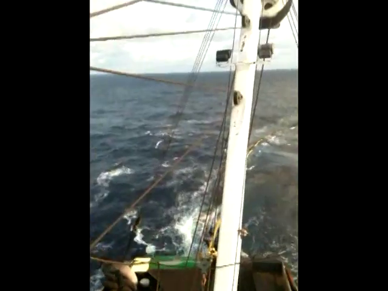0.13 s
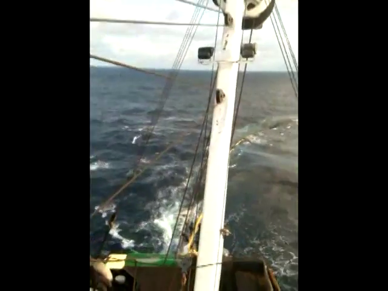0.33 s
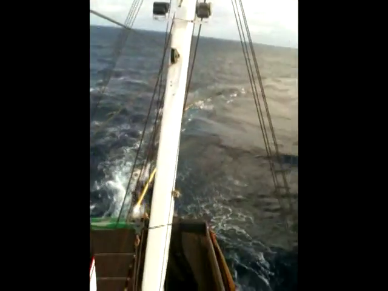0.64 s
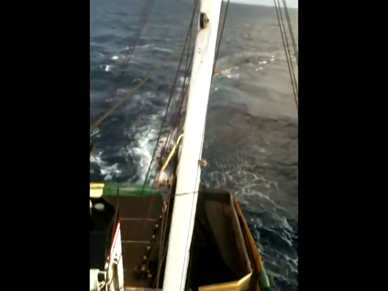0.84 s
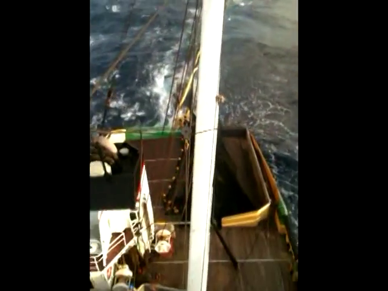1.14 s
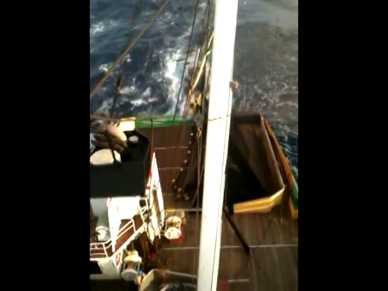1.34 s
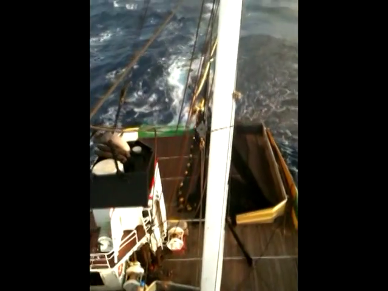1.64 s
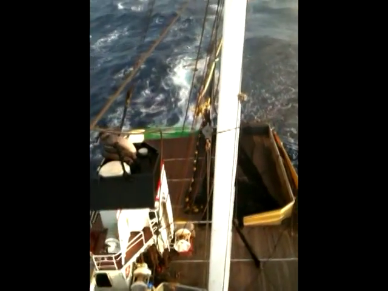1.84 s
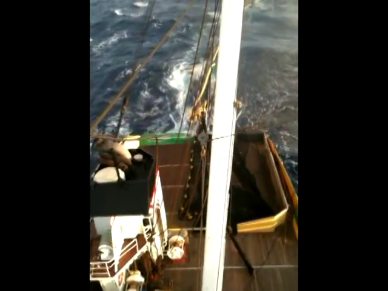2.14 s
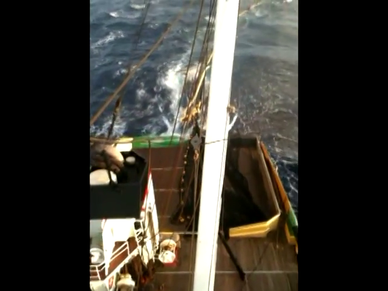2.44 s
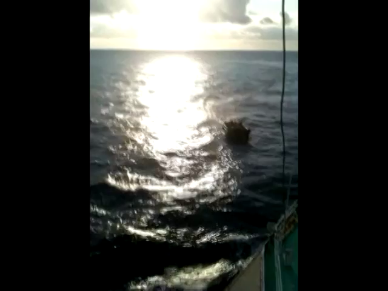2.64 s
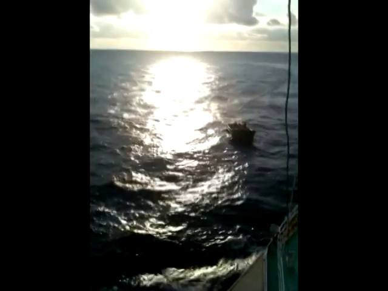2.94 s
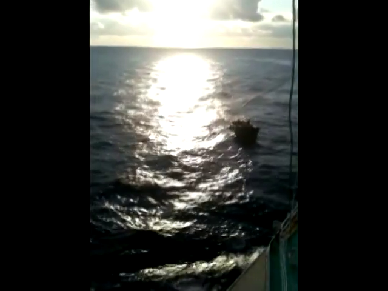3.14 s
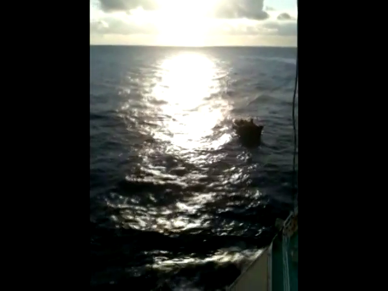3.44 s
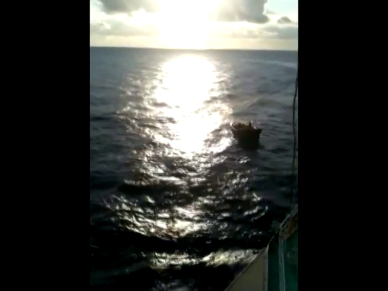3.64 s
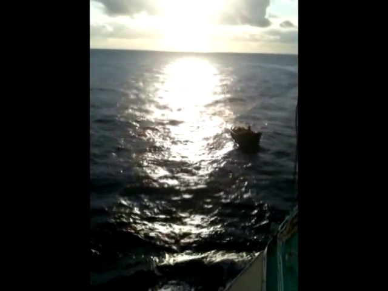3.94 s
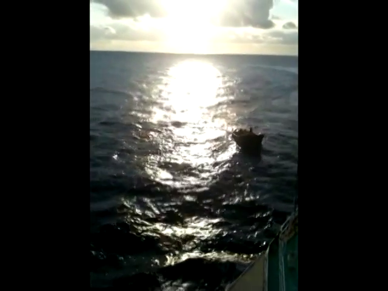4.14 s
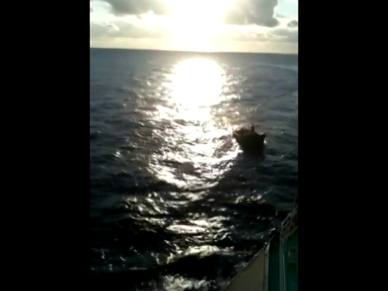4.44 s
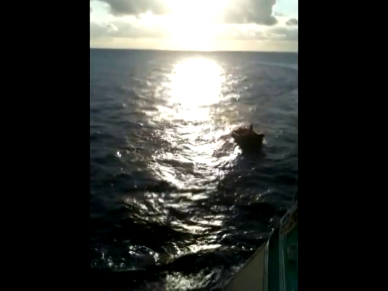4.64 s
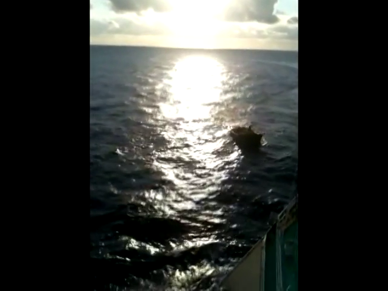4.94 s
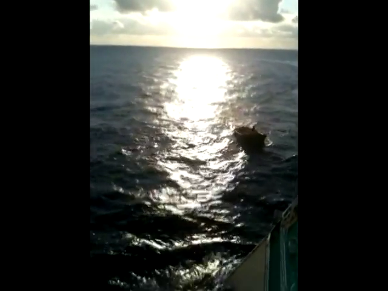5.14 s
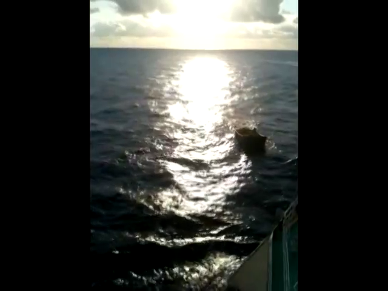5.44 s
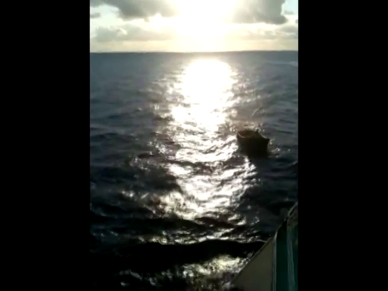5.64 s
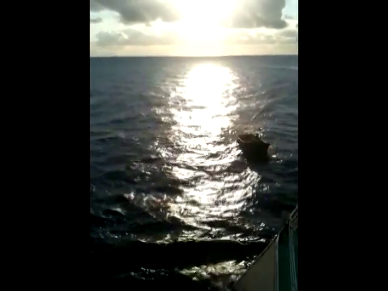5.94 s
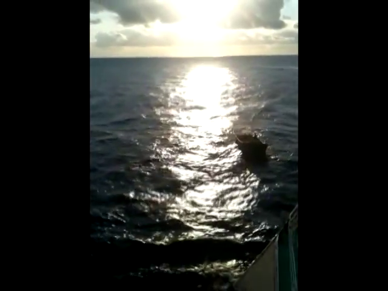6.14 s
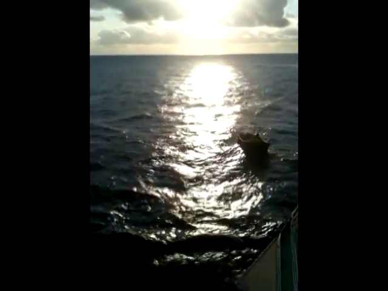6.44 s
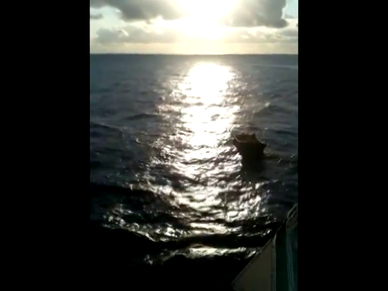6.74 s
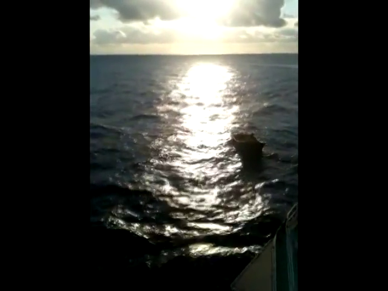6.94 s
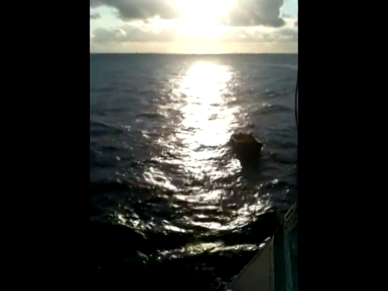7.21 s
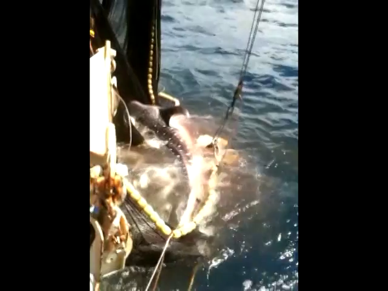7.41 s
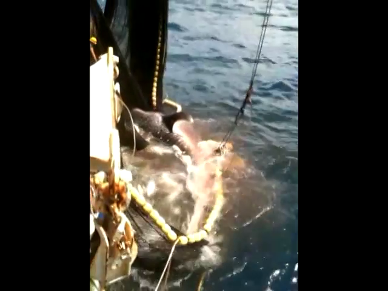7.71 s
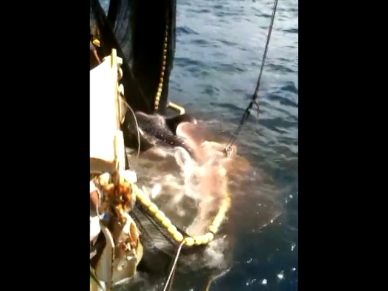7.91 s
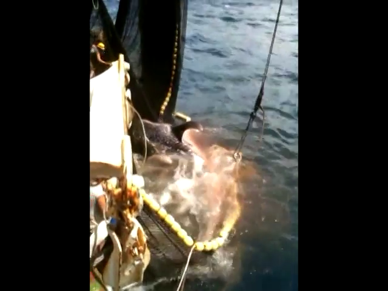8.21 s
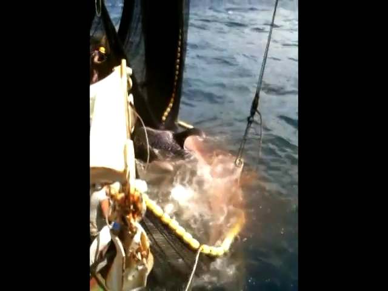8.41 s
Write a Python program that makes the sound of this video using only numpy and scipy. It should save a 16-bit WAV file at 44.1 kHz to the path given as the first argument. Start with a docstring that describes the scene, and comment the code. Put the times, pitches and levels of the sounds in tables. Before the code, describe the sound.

Three abrupt views of a working boat at sea. First a dense engine roar with hissing wash, rapid metallic chirps and short groans. Then a much softer, dull drone with generator hum and barely audible thin whistle, almost no hiss. Finally the full roar returns, with steady hydraulic and gear whine and a cluster of dull hull knocks at its start. Close, small-microphone outdoor sound, little bass.

```python
"""A diesel engine drones in a fishing boat at sea, heard from three places in turn: high over the working deck,
at a sheltered rail and beside the net. Shaped noise beats at the firing rate; wash and wind are its hiss.
Over the deck, stick-slip noise through sharp modes makes a sheave squeak and scrape and a winch drum groan.
The rail adds a generator hum and a whistle that runs down; beside the net come the sines of a hydraulic pump
and winch gears, and decaying sines that thump."""
import sys
import numpy as np
from scipy import signal
from scipy.fft import rfft, irfft, next_fast_len
from scipy.io import wavfile
from scipy.ndimage import uniform_filter1d, map_coordinates

SR = 44100
rng = np.random.default_rng(int(sys.argv[2]) if len(sys.argv) > 2 else 0)


def store_wav(level_fs):
    """Save 16-bit WAV to argv[1]."""
    pcm = np.round(np.clip(np.atleast_2d(level_fs), -1, 1) * 32767)
    wavfile.write(sys.argv[1], SR, pcm.T.astype(np.int16))


N = 377923
T = np.arange(N) / SR  # time of each sample (s)


def amp(db):
    """Decibels to amplitude ratio: 20 dB is a factor of ten."""
    return 10 ** (np.asarray(db) / 20)


def unit(x):
    """Normalisation to an rms of 1."""
    return x / np.sqrt(np.mean(x ** 2) + 1e-20)


def along(points, hz):
    """Interpolation of (frequency, value) points on a logarithmic frequency axis."""
    f, v = np.transpose(points)
    return np.interp(np.log(hz + 1), np.log(f + 1), v)


def curves(rows):
    """Linear interpolation in time: one curve for each column after the time."""
    s, *columns = np.transpose(rows)
    return [np.interp(T, s, column) for column in columns]


def wobble(rate):
    """Smooth random modulation: a spline through rate random knots a second."""
    knots = rng.standard_normal(int(N * rate / SR) + 4)
    return map_coordinates(knots, [T * rate])


def filtered(x, response):
    """Linear filtering: the spectrum of x times a response of frequency."""
    m = next_fast_len(N + SR // 2)  # padded against wrap-around
    return irfft(rfft(x, m) * response(np.fft.rfftfreq(m, 1 / SR)), m)[:N]


def ringing(x, modes):
    """Modal superposition: x through parallel resonances of alternating sign, at rms 1."""
    def response(f):
        return sum((-1) ** k * amp(db) * 1j * f * width / (hz * hz - f * f + 1j * f * width)
                   for k, (hz, width, db) in enumerate(modes))
    return unit(filtered(x, response))


def tone(hz, drift_hz):
    """Frequency modulation: a sine of rms 1 whose pitch drifts a little at random."""
    cycles = np.cumsum(hz + drift_hz * wobble(6)) / SR
    return np.sqrt(2) * np.sin(2 * np.pi * cycles + rng.uniform(0, 2 * np.pi))


def patches(x, gain):
    """Time-frequency modulation: smoothed random patches set the gain of x."""
    z = signal.stft(x, nperseg=512)[2]
    field = uniform_filter1d(rng.standard_normal(z.shape), 7, 0)
    field = uniform_filter1d(field, 8, 1)
    return signal.istft(z * gain(unit(field)), nperseg=512)[1][:N]


def patchy(depth_db):
    """Turbulent noise: white noise made uneven in time and frequency."""
    return patches(rng.standard_normal(N), lambda field: amp(depth_db * field))


def bursts(rows, rise):
    """Transient envelope: a linear rise under a Gaussian fall, for rows of (start_s, level_db, length_s)."""
    return sum(amp(db) * np.clip((T - s) / rise, 0, 1) * np.exp(-np.clip((T - s) / abs(span), 0, 9) ** 2)
               for s, db, span in rows)


def spells(rows, rise, fall):
    """Driven-then-free envelope: linear attack, hold, exponential release, for (start_s, level_db, held_s)."""
    out = np.zeros(N)
    for s, db, held in rows:
        part = slice(*np.searchsorted(T, [s, s + abs(held) + 12 * abs(fall)]))
        t = T[part] - s
        out[part] += amp(db) * np.clip(t / rise, 0, 1) * np.exp(-np.clip(t - held, 0, None) / fall)
    return out


def slips(rate, depth_db):
    """Stick-slip friction: noise whose level is redrawn rate times a second, its peaks limited."""
    return rng.standard_normal(N) * amp(depth_db * np.clip(wobble(rate), -3, 1.5))


def rubbed(hz, width, rate, depth_db):
    """Friction-driven resonance: slips through one mode twice, for steep skirts."""
    mode = [(hz, 1.6 * width, 0)]  # two passes narrow it back to about the given width
    return ringing(ringing(slips(rate, depth_db), mode), mode)


def wandering(modes, rate, depth_db, wander_db):
    """Mode competition: rubbed modes take turns at being loudest."""
    return unit(sum(amp(db + wander_db * wobble(24.96)) * rubbed(hz, width, rate, depth_db)
                    for hz, width, db in modes))


def engine(place, spectrum, hull_db, beat, patchy_db):
    """Pulse excitation and plate resonance: firing beats in the drone, noise rings the hull, and hiss lies above."""
    # by place: time_s, drone_level_db, hiss_level_db (rms from 800 to 3500 Hz)
    levels = [
        [(0, -26.5, -27), (1, -26.5, -28.5), (1.9, -25, -26), (2.67, -25.5, -26.5)],
        [(2.7, -32.5, -50), (3.1, -29.5, -49.5), (3.8, -33.5, -53), (5.3, -33.5, -52), (6.2, -33, -51.5),
         (7.34, -34, -51.5)],
        [(7.37, -27.5, -28.5), (7.7, -26, -28.5), (8.55, -27.5, -30)],
    ]
    # strongest engine tones, by place: pitch_hz, level_db
    drone_tones = [
        [(155, -37.5), (241, -38.5)],
        [(133, -51.5), (162, -41), (242, -42), (264, -46.5), (298, -49.5), (920, -67), (1210, -70),
         (1490, -71.5)],
        [(153, -37), (228, -42)],
    ]
    # hull plate modes: pitch_hz, width_hz, relative_level_db
    hull_modes = [(153.3, 13.2, -1.5), (244.3, 9.9, -2.5), (162.4, 5.8, -6.5), (498.4, 15, -9),
                  (545, 19, -11.5)]
    firing_hz = 33.3

    def low(f):
        return 1 / (1 + (f / 700) ** 4)

    drone_db, hiss_db = curves(levels[place])
    cycle = np.cumsum(firing_hz + 0.251 * wobble(1)) / SR % 1
    firing = np.exp(-cycle / 0.04)  # one exhaust pulse per firing
    push = patchy(patchy_db) + beat * unit(firing - firing.mean())
    drone = unit(filtered(push, lambda f: amp(along(spectrum, f)) * low(f)))
    hull = filtered(ringing(rng.standard_normal(N), hull_modes), low)
    drone = unit(drone + amp(hull_db) * hull)

    hiss = filtered(patchy(patchy_db), lambda f: amp(along(spectrum, f)) * (1 - low(f)))
    hiss /= np.std(filtered(hiss, lambda f: (f > 800) & (f < 3500)))
    tones = sum(amp(db + 2.5 * wobble(7)) * tone(hz, 2.176) for hz, db in drone_tones[place])
    return tones + amp(drone_db + 0.48 * wobble(3.5)) * drone + amp(hiss_db + 0.3 * wobble(7)) * hiss


def sheave_squeak():
    """Stick-slip: two sheave modes flutter as it runs, easing with time, and chirp at the sharpest squeaks."""
    # low and high sheave mode: pitch_hz, width_hz, running_offset_db
    modes = [(7220, 240, -2.5), (7700, 370, -3)]
    # sharpest squeaks: start_s, held_s, low_mode_db, high_mode_db
    chirps = [(.002, .018, -38.5, -41), (0.079, .012, -40.5, -27.5), (.1, .02, -31.5, -28),
              (.148, .012, -36, -34), (.198, .024, -40, -36), (.25, .03, -40.5, -43),
              (.296, .024, -27.5, -30.5), (.372, .022, -39, -42), (.53, .02, -42, -41),
              (.548, .012, -40.5, -33), (.588, .01, -38.5, -40.5), (.638, .024, -28.5, -39),
              (.672, .03, -38, -44.5), (.728, .02, -36, -41), (.822, .008, -41.5, -43),
              (.84, .04, -46.5, -45), (.97, .036, -36.5, -37.5), (1.246, .012, -33.5, -30),
              (1.508, .02, -43, -52), (2.02, .055, -45.5, -42), (2.279, .008, -46, -32),
              (2.386, .022, -41.5, -41)]
    running_db = -41 - 4.5 * T  # eases by 4.5 dB per second
    squeak = 0
    for k, (hz, width, db) in enumerate(modes):
        running = amp(running_db + db + 3.2 * wobble(45))
        chirping = spells([(row[0], row[2 + k], row[1]) for row in chirps], .005, 0.0084)
        squeak = squeak + (running + chirping) * rubbed(hz, width, rate=220, depth_db=5.0)
    return squeak


def sheave_squeal():
    """Mode locking: competing high modes squeal in spells, and at moments one clear pitch stands out."""
    # high modes: pitch_hz, width_hz, relative_level_db
    modes = [(10980, 280, 0.5), (11400, 96, -2), (11600, 80, -1.5), (12200, 230, -4), (12800, 300, -7)]
    # spells of high squealing: start_s, level_db, held_s
    squeals = [(.138, -36, 0.017), (.165, -42, 0.023), (.19, -34.5, 0.042), (.238, -31, 0.018),
               (.262, -37.5, 0.065), (.336, -34.5, .018), (.37, -40, 0.072), (.442, -34, 0.037),
               (1.05, -41, 0.014), (1.172, -39.5, 0.026), (1.204, -34.5, 0.017), (1.272, -48.5, 0.018),
               (1.42, -41.5, 0.032), (1.47, -45, 0.05), (1.632, -31.5, 0.025), (2.015, -42, 0.079),
               (2.09, -34.5, 0.042), (2.128, -34.5, 0.032), (2.17, -41.5, 0.043), (2.568, -33.5, 0.014)]
    # moments of one clear pitch: start_s, level_db, held_s, pitch_hz
    locks = [(1.42, -46, .03, 12150), (1.433, -41, .025, 11450), (1.473, -31, .018, 11450),
             (1.495, -44, .035, 11480)]
    level = amp(-57) + spells(squeals, .007, 0.0069)  # a faint running squeal under the spells
    squeal = level * amp(2.2 * wobble(70)) * wandering(modes, 140, depth_db=0.5, wander_db=3.0)
    locked = sum(spells([(s, db, held)], .004, .005) * tone(hz, 25) for s, db, held, hz in locks)
    return squeal + locked


def sheave_scrape():
    """Sliding friction: a steady broad scrape, with rasp and hiss when the line jerks over the sheave."""
    # broad scrape spectrum: frequency_hz, relative_level_db (per Hz)
    spectrum = [(2500, -15.5), (4000, -0.5), (5000, 3.5), (6500, -1), (9000, -3), (12000, -9),
                (14500, -30.5)]
    # jerks of the line: start_s, length_s, rasp_pitch_hz, rasp_level_db, hiss_level_db
    jerks = [(1.042, 0.043, 6460, -34, -44.5), (1.171, .05, 5000, -32.5, -46.5),
             (1.2, 0.038, 4960, -26, -37), (1.305, 0.081, 5180, -41, -51.5),
             (1.625, 0.047, 5820, -36.5, -30.5), (1.918, 0.025, 4560, -41, -35),
             (2.117, 0.054, 5000, -34, -31), (2.407, .03, 5500, -35.5, -36),
             (2.563, 0.035, 5500, -36.5, -30.5)]
    rasp = sum(bursts([(s, db, span)], 0.0099) * rubbed(hz, width=710, rate=150, depth_db=2.0)
               for s, span, hz, db, _ in jerks)
    hiss = bursts([(s, db, span) for s, span, _, _, db in jerks], 0.0088)
    broad = unit(filtered(slips(150, 3.7), lambda f: amp(along(spectrum, f))))
    return (amp(-42.5) + hiss) * broad + rasp


def groan():
    """Selective modal excitation: the loaded line rubs the drum, and modes near each groan's pitch speak most."""
    # winch drum modes: pitch_hz, width_hz, mode_offset_db
    modes = [(1400, 60, -6.5), (1524, 60, -6), (1604, 46, -8.5), (1695, 40, -7), (1883, 49, -7),
             (2058, 47, -6), (2180, 40, -5), (2430, 270, -3.5)]
    # groans: start_s, level_db (before the mode offset), held_s, loudest_near_hz
    groans = [(1.22, -30.5, 0.17, 1400), (1.53, -27, 0.061, 1450), (1.61, -25.5, 0.032, 1850),
              (1.7, -30, 0.022, 1500), (1.91, -25.5, 0.17, 1800), (2.09, -24, 0.098, 1850),
              (2.25, -26.5, .02, 1700), (2.41, -29.5, 0.13, 1700), (2.54, -28.5, 0.075, 1950)]
    fall_db_per_khz = 13  # modes further from the pitch speak less
    out = 0
    for hz, width, offset_db in modes:
        rows = [(s, db - fall_db_per_khz * abs(hz - near) / 1000, held) for s, db, held, near in groans]
        level = spells(rows, 0.019, 0.04) * amp(offset_db + 1.8 * wobble(25))
        out = out + level * rubbed(hz, width, 80, depth_db=2.0)
    return out


def deck():
    """Superposition high over the deck: engine, wavering machine tones, sheave and drum."""
    # roar of engine room, wash and wind: frequency_hz, relative_level_db (per Hz)
    roar = [(25, -39), (81, -21.5), (157, 0), (492, 1.5), (884, -7), (1070, -8.5), (1350, -10),
            (3720, -24.5), (6170, -30), (7430, -30.5), (8720, -37), (13500, -46.5), (14400, -60)]
    # machine tones: pitch_hz, level_db
    machine_tones = [(995, -42), (1492, -44.5), (1400, -48), (1771, -44)]
    tones = sum(amp(db + 2.5 * wobble(12)) * tone(hz, 3) for hz, db in machine_tones)
    gear = sheave_squeak() + sheave_squeal() + sheave_scrape() + groan()
    return engine(0, roar, hull_db=-2.0, beat=0.034, patchy_db=1.5) + tones + gear


def generator():
    """Periodic rotation: one wavering hum that holds, then dies away."""
    fade_s, fade_db_per_s = 5.6, 30
    hum_db = -45 - fade_db_per_s * np.clip(T - fade_s, 0, 9)
    return amp(hum_db + 1.6 * wobble(10)) * tone(453.4, 1.507)


def turbo_whistle():
    """Exponential spin-down: a thin whistle holds its pitch until the throttle eases, then runs towards idle."""
    # whistle level: time_s, level_db
    whistle_levels = [(2.7, -84), (2.9, -76), (4.0, -79), (4.45, -87), (4.7, -75), (6.0, -72), (6.42, -74),
                      (6.54, -88), (6.63, -73), (6.85, -82), (7.05, -98)]
    turbo_hz, idle_hz = 7120, 4500
    throttle_back_s, spin_down_s = 6.37, 1.7
    slowing = np.exp(-np.clip(T - throttle_back_s, 0, 9) / spin_down_s)
    whistle_db, = curves(whistle_levels)
    flicker_db = 5.6 * np.minimum(wobble(14), .5)
    return amp(whistle_db + flicker_db) * tone(idle_hz + (turbo_hz - idle_hz) * slowing, 3.5)


def rail():
    """Shielding from the gear: only engine, generator and whistle add up here."""
    # roar at the rail: frequency_hz, relative_level_db (per Hz)
    roar = [(25, -43), (60, -28), (100, -17.5), (150, -7.5), (210, -7.5), (250, -9), (540, -15.5),
            (580, -16), (1000, -27), (1300, -36.5), (1750, -39.5), (2000, -47), (3800, -52.5),
            (4400, -56.5), (6000, -61), (7200, -59.5), (8000, -65), (11500, -65), (12000, -73),
            (12400, -90)]
    return engine(1, roar, hull_db=-4.0, beat=0.063, patchy_db=1.0) + generator() + turbo_whistle()


def pump():
    """Harmonic series: hydraulic pulses through the pipework sound at multiples of the piston rate."""
    # pump pulses: multiple, level_db
    harmonics = [(1, -41), (3, -46), (4, -46), (5, -47), (6, -50), (7, -42), (8, -41), (9, -52), (10, -53),
                 (11, -54)]
    piston_hz = 295.25
    return sum(amp(db + 2.1 * wobble(9)) * tone(k * piston_hz, 0.298 * k) for k, db in harmonics)


def winch_mesh():
    """Gear meshing: regular tooth contact gives one wavering tone."""
    # gear-mesh tone: pitch_hz, level_db
    mesh_hz, mesh_db = (937, -45.5)
    return amp(mesh_db + 1.5 * wobble(8.3)) * tone(mesh_hz, 3.0)


def thumps():
    """Impact and radiation: blows ring a plate at their own pitch with low noise; deep bass radiates poorly."""
    # blows: start_s, ring_pitch_hz, ring_peak_db (before the bass cut), held_s
    blows = [(7.462, 164.5, -14.5, 0.017), (7.491, 300, -18.5, .008), (7.511, 204, -15.5, 0.0088),
             (7.627, 225, -24, .02), (7.70, 155, -20, 0.032), (7.768, 236, -24.5, 0.024)]
    slosh = filtered(rng.standard_normal(N), lambda f: 1 / (1 + (f / 860) ** 4))
    slosh = amp(-7) * unit(slosh)  # relative to the ring's peak
    sound = sum(spells([(s, db, held)], 0.0067, 0.01) * (np.sin(2 * np.pi * hz * (T - s)) + slosh)
                for s, hz, db, held in blows)
    return filtered(sound, lambda f: 1 / (1 + (80 / (f + 1)) ** 4))


def net():
    """Superposition beside the net: engine, whining pump, winch gears and heavy thumps on the hull."""
    # roar beside the net: frequency_hz, relative_level_db (per Hz)
    roar = [(25, -62), (70, -35), (110, -23.5), (153, -2), (190, -9), (290, -5.5), (340, -11), (650, -8.5),
            (800, -12.5), (1350, -16), (1500, -15), (2400, -16), (2700, -20), (3400, -23.5), (6000, -29.5),
            (10200, -35), (13000, -44.5), (14400, -55.5)]
    return engine(2, roar, hull_db=-9.5, beat=0.031, patchy_db=1.4) + pump() + winch_mesh() + thumps()


def scene():
    """Superposition in time: three places in turn, with faint random patches opposite in the two channels."""
    # moments when the listening place changes: from deck to rail, from rail to net [s]
    moves = (2.6838, 7.3553)
    # filter on the opposite patches: frequency_hz, gain_db
    patch_gain = [(1000, -68.5), (2000, -40), (2600, -4.5), (4000, -19.5), (6000, -14.5), (13000, -16)]
    leave, arrive = [np.clip((T - s) / .0015 + .5, 0, 1) for s in moves]
    common = (1 - leave) * deck() + leave * (1 - arrive) * rail() + arrive * net()
    # random treble patches, opposite in the two channels
    sparse = patches(common, lambda field: np.sign(field) * np.clip(np.abs(field) - .9, 0, 1))
    opposite = filtered(sparse, lambda f: amp(along(patch_gain, f)))
    return np.array([common + opposite, common - opposite])


def record(dry):
    """Band limitation: a small microphone drops the deepest bass, and nothing above the top is kept."""
    top_hz, bass_hz = 14400, 45

    def response(f):
        return (f < top_hz) / np.sqrt(1 + (bass_hz / (f + 1)) ** 4)
    return np.array([filtered(channel, response) for channel in dry])


dry = scene()
out = record(dry)
store_wav(out)
```